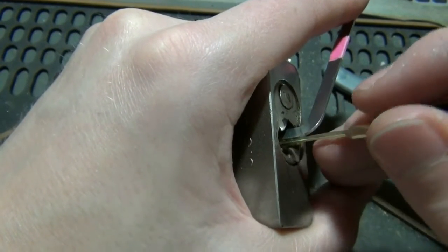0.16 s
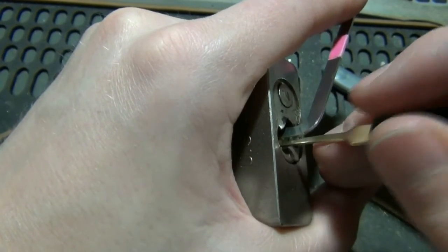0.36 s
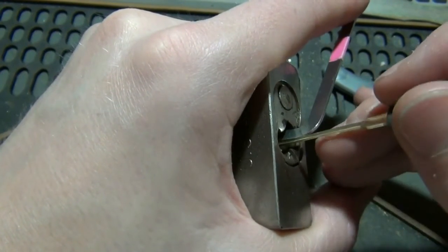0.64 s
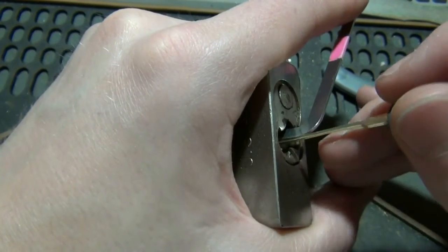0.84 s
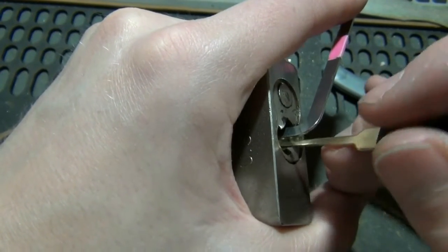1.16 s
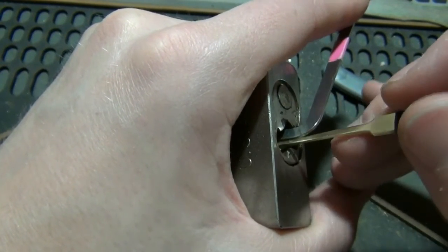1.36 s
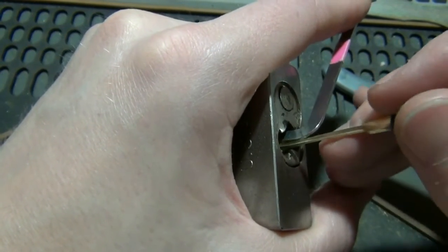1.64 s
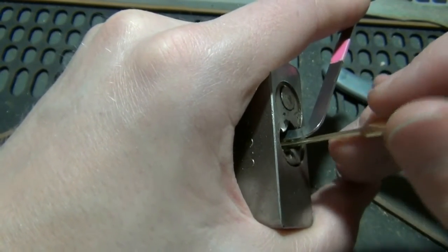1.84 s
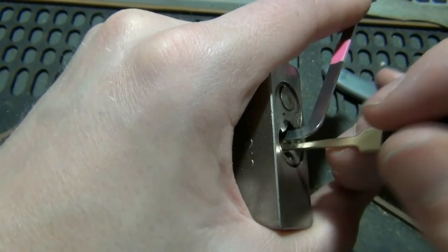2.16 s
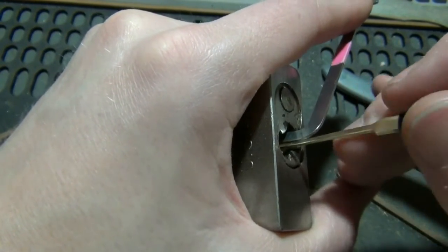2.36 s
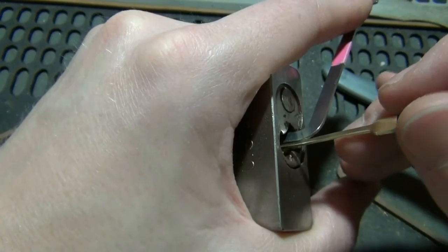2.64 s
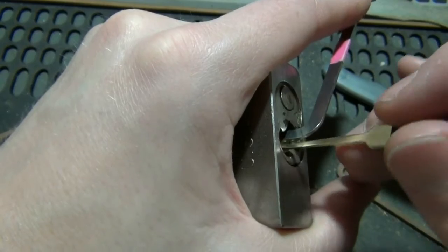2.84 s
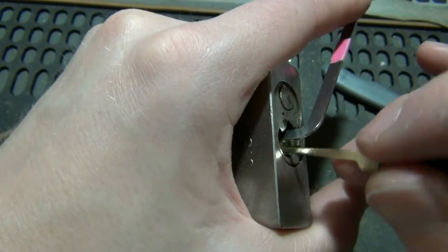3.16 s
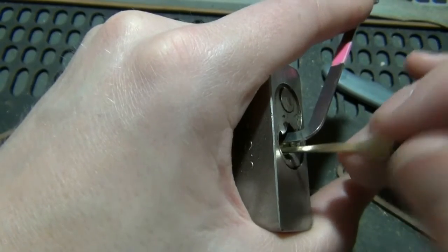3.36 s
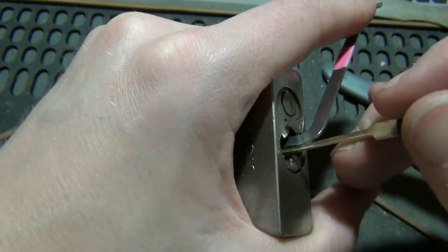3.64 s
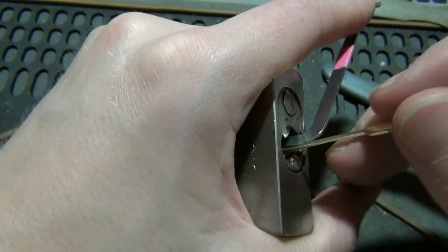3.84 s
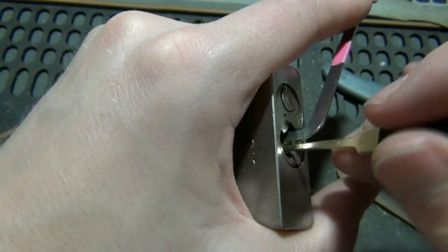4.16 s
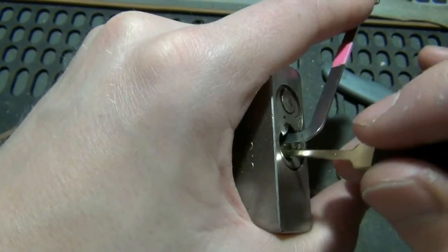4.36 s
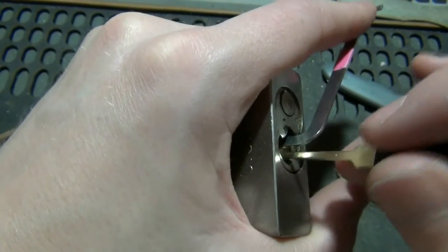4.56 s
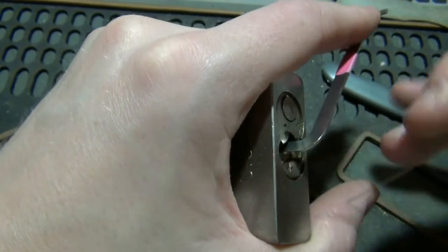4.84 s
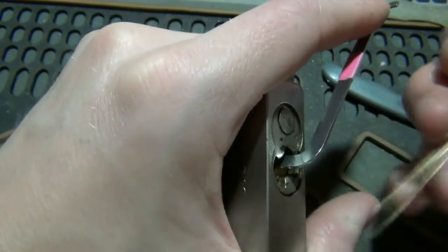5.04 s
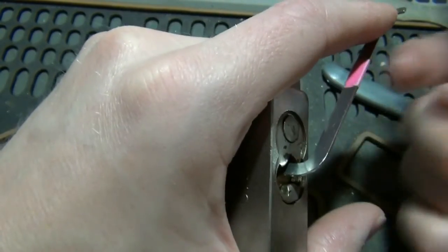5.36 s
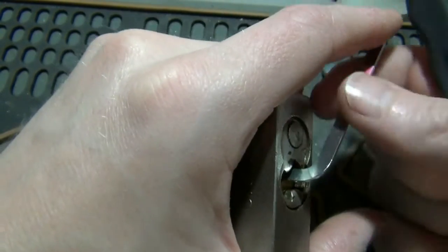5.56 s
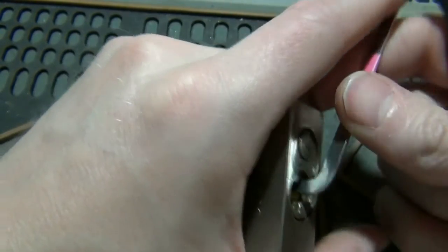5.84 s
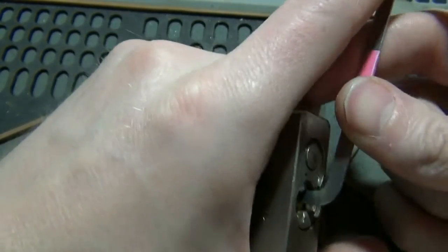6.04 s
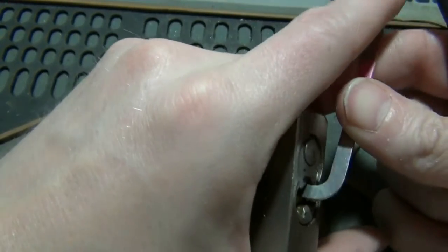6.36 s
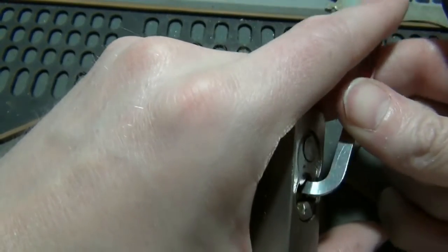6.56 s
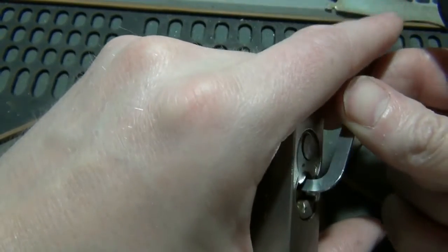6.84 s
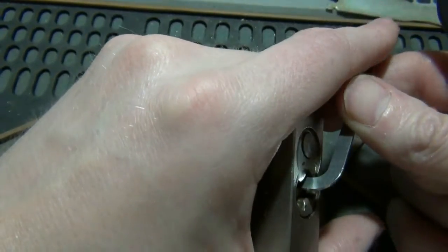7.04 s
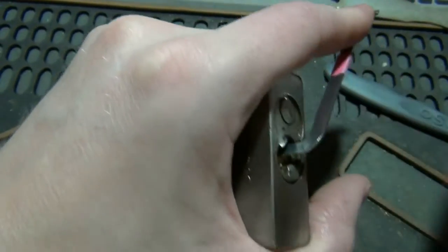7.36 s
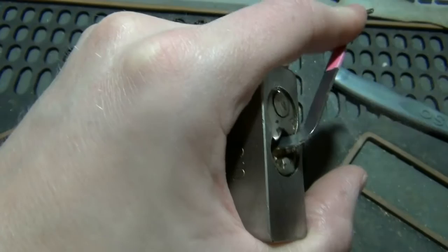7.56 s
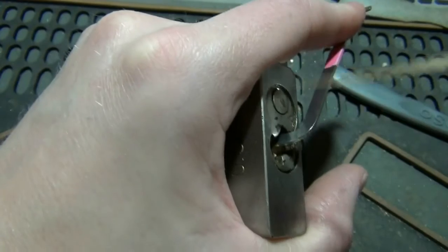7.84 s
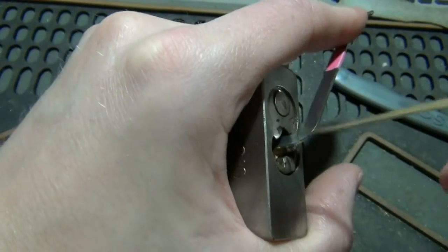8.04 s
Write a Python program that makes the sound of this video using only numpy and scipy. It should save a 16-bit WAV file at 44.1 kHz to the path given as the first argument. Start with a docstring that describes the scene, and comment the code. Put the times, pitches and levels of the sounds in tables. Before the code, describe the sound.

A padlock is worked in the hand close to the microphone, slightly right of centre, in a small room with quiet air, a soft fan drone, low hum and a thin beating high whine. A duller click at 0.3 s follows faint ticks; brighter snaps come at about 1.0, 1.3, 1.5 and 1.9 s, some with a brief springy shimmer. A tight cluster clicks at 2.3 s, then mostly faint ticks until firmer contacts at 4.1-4.3 s, the last with a low knock. From 4.7 to 4.9 s the pick rattles and scrapes out. Dull knocks and dry finger rubbing follow at 5.0-5.6 s, with a softer-toned click near 5.5 s and the loudest sharp snap at 5.7 s. Weak ticks appear around 6.5-6.8 s, then gentle skin rubbing and small scuffs at 7.1-7.7 s before the quiet background remains.

```python
"""A padlock is picked in the hand, close to the microphone, over a workbench in a small room.
Pick and pins snap: noisy bursts of force excite the lock's damped modes; faint ticks fall between.
Filtered noise makes the ringing springs and tools, scrapes, scuffs, rubbing fingers, dull bumps and low knocks.
The pick is drawn out and fingers reset the tension wrench. Reflections and a faint tail place the lock
in the room; behind it lie air noise, a droning fan, wavering hum and a thin beating whine."""
import sys
import numpy as np
from scipy import signal
from scipy.fft import rfft, irfft, next_fast_len
from scipy.io import wavfile

SR = 44100
rng = np.random.default_rng(int(sys.argv[2]) if len(sys.argv) > 2 else 0)


def unload_audio(sound):
    """Save the sound as a 16-bit wav file, at the path given as the first command line argument."""
    columns = np.transpose(np.atleast_2d(sound))
    # keep every value between -1 and 1, then stretch to whole-number steps
    steps = np.round(np.clip(columns, -1, 1) * 32767)
    wavfile.write(sys.argv[1], SR, steps.astype(np.int16))


N = 361619
TIME = np.arange(N) / SR

# room air, relative spectrum: (f/Hz, level/dB per Hz)
AIR_SPECTRUM = [(20, -12.5), (45, -1.5), (75, 3), (130, -6), (170, -7), (330, -9), (500, -12), (1000, -12),
                (2000, -15), (3000, -18), (3800, -21), (7000, -21.5), (11000, -23), (15800, -23.5)]
# fan housing resonances: (f/Hz, width/Hz before the fan's widening, relative level/dB)
FAN_MODES = [(616.7, 59, 2.5), (685, 24.5, 0), (877.6, 74, 3), (1118, 130, -8), (1339, 80, -2.5),
             (1671, 80, -4)]
AIR_DB, FAN_DB = -60, -63.5  # rms of the part common to both channels, before panning
# mains and motor hum, mean values: (f/Hz, rms level/dB)
HUM_TONES = [(80.7, -72.5), (120, -73), (240, -79.5), (635, -84)]
# whine of the electronics, the upper pair beating: (f/Hz, rms level/dB)
WHINE_TONES = [(11832, -79), (15734.3, -67.5), (15747.5, -72.5)]
# dull bumps of the hands, and the low knocks of some hard contacts:
# (centre t/s, length/s, peak level/dB, centre f/Hz)
BUMPS_AND_KNOCKS = [(0.244, 0.11, -48, 104), (1.094, 0.07, -54, 105), (1.504, 0.02, -54, 220),
                    (1.665, 0.034, -55, 140), (2, 0.15, -58.5, 90), (2.875, 0.048, -66, 85),
                    (4.283, 0.017, -43.5, 262), (5.051, 0.051, -50, 160), (5.053, 0.016, -53, 347),
                    (5.84, 0.075, -57.5, 95), (6.879, 0.13, -64, 333), (7.174, 0.2, -63, 340),
                    (7.727, 0.44, -62.5, 325)]
# skin sliding over lock and tools: (centre t/s, length/s, peak level/dB, tilt/dB per octave)
SKIN_RUBS = [(5.113, 0.15, -55.5, -3), (5.206, 0.15, -56.5, 2), (5.362, 0.19, -53.5, -1),
             (5.543, 0.077, -61.5, 4), (5.63, 0.099, -64, -2), (7.102, 0.091, -56.5, 2),
             (7.27, 0.2, -57, 0), (7.474, 0.17, -58.5, 3.5), (7.619, 0.22, -59.5, 0.7)]
# broad peaks of skin rubbing on metal: (f/Hz, width/Hz of one filter pass, mean relative level/dB)
SKIN_PEAKS = [(1630, 2600, -1.5), (2980, 2900, 5), (6770, 3300, -1), (9300, 1800, -1.5),
              (13500, 5000, -0.5)]
# scrapes of metal in the keyway, and two short scuffs of the rubbing hand (the last two rows):
# (centre t/s, length/s, peak level/dB, centre f/Hz)
SCRAPES_AND_SCUFFS = [(0.236, 0.046, -57, 3480), (0.398, 0.061, -56.5, 5060), (1.084, 0.14, -62, 5430),
                      (1.276, 0.027, -46, 4900), (1.98, 0.2, -62.5, 4500), (3.394, 0.06, -60.5, 9000),
                      (4.667, 0.083, -55.5, 6000), (4.727, 0.11, -47, 6550), (4.86, 0.17, -56.5, 6360),
                      (5.042, 0.03, -46.5, 4500), (5.088, 0.03, -48.5, 7000), (5.866, 0.24, -64.5, 5500),
                      (7.294, 0.055, -62, 2900), (7.635, 0.057, -63, 2600)]
# springs and tools left ringing, and one low knock that dies away (900 Hz):
# (t/s, f/Hz, width/Hz of one filter pass, starting level/dB, t60/s)
RINGS_AND_KNOCK = [(.962, 12500, 3000, -37, 0.2), (.962, 5050, 4000, -49, 0.2),
                   (1.283, 12600, 3000, -45, 0.18), (1.868, 13500, 3000, -43, 0.17),
                   (1.868, 5100, 5000, -43.5, 0.13), (2.286, 11900, 1500, -53, 0.13),
                   (4.151, 2400, 60, -54, 0.17), (4.242, 2330, 50, -46, 0.069),
                   (4.85, 7700, 900, -52, 0.22), (5.469, 2270, 900, -49, 0.16),
                   (5.467, 900, 300, -49, 0.073), (5.681, 6700, 1500, -55, 0.1),
                   (5.83, 6650, 343, -67.5, 0.5)]
# the hand-damped lock with the tools in it, mean modes: (f/Hz, relative level/dB, t60/s)
LOCK_MODES = [(260, -9, 0.0088), (875, -9, 0.032), (1596, -8, 0.03), (1770, -5, 0.014), (2360, -7, 0.026),
              (2780, 3, 0.0082), (3090, 3, 0.0079), (4440, -10, 0.011), (5220, 1, 0.0073),
              (5720, 8.5, 0.0072), (6610, 4.5, 0.0057), (7300, -22, 0.0096), (8540, -1.5, 0.011),
              (9730, -3.5, 0.011), (11050, 4, 0.013), (11700, -8, 0.022), (11900, 11.5, 0.005),
              (12200, 5, 0.012), (13240, -7, 0.0047), (14220, 10, 0.0058), (16400, -13, 0.0038)]
# borders of the six registers, knock to sparkle: (f/Hz)
REGISTER_EDGES = [120, 600, 2000, 4000, 7500, 11000, 15800]
# an average contact in each register, knock to sparkle, relative to its strength: (level/dB)
MEAN_CONTACT_DB = [-15, 1, 7, -0.5, -0.75, -1]
# lift of each register by a harder contact: (level/dB per dB of hardness)
HARDNESS_SHARES = [0, 0.021, 0.067, 0.087, .59, 1]
# lift of each register by a firmer seat in the lock's body: (level/dB per dB of seat)
BODY_SHARES = [0.83, 0.98, 1, 0.058, 0, 0]
# pick, pin and wrench contacts: (t/s, strength level/dB, hardness level/dB,
# part passed to the lock's body level/dB, struck part f/Hz, share of sliding before the snap/0-1)
CONTACTS = [(0.198, -52.5, -2.5, -0.5, 1690, 0.1), (0.2139, -61, 6, -1, 2210.0, 0),
            (0.2591, -34.5, -18.5, -6.5, 5830, 0.02), (0.3884, -54.5, -2, -8, 5100, 0.12),
            (0.6754, -56.5, -16, -8, 4770, 0.1), (0.6901, -59, -1, -5, 1640.0, 0.3),
            (0.9604, -30, 5.5, -11, 4740, 0.05), (1.0523, -53.5, -16, -13, 6100, 0),
            (1.0763, -54, -10, -2, 2340, 0.47), (1.281, -27.0, 1.5, -16.5, 5960, 0.1),
            (1.3183, -46, 5.5, -8.5, 5050, 0.06), (1.5049, -30, -8, -18.5, 6530, 0.11),
            (1.662, -43.5, -5.5, -10, 4900, 0.16), (1.8664, -25.5, 1.5, -12.5, 4750, 0.01),
            (1.947, -48, 6.5, -4.5, 5860, 0.2), (1.9907, -58.5, -13, -5, 5900.0, 0.16),
            (2.0106, -56.5, -14, -4, 6000, 0), (2.1698, -70, -5, 8, 3120, 0.17),
            (2.2597, -43.5, -18, -11, 5850.0, 0.15), (2.2692, -44, -15, -16, 5960.0, 0.1),
            (2.2813, -43.5, 1, -2, 2820.0, 0.4), (2.2842, -35, 4.5, -9, 5960, 0),
            (2.3033, -37.5, -1, -18.5, 4870, 0.01), (2.8457, -61.5, -14, 2, 2750, 0.5),
            (3.4074, -56.5, -14, -6, 5930.0, 0.2), (3.4556, -55.5, 1, -10, 6640, 0.1),
            (3.482, -46, -6.5, -9, 5100, 0.16), (3.7018, -60, 1, -3.5, 2810.0, 0.12),
            (3.953, -53, -10.5, -12, 4360, 0.6), (4.0303, -53.5, -5, -21, 6060.0, 0.15),
            (4.0833, -41.0, -6, -3, 3210, 0.1), (4.1504, -36.5, -3, -3, 1560, 0.08),
            (4.2411, -41.0, -2, -13, 5640, 0.36), (4.2857, -32.5, -5.5, -11, 7080, 0.2),
            (4.5866, -57, -11, -9, 7020.0, 0.1), (4.6863, -33.0, 3.5, -12.5, 6600, 0.01),
            (4.69, -36.5, -5, -11.5, 5800.0, 0.37), (4.698, -47, 2, -18, 6890.0, 0.15),
            (4.716, -46, 2, -25, 4660.0, 0.1), (4.731, -46, -8, -14, 6700, 0.29),
            (4.7554, -43, -5, -14, 6700, 0.6), (4.8248, -55.5, -7, -9, 6540, 0.3),
            (4.8508, -42, -11.5, -8, 2770.0, 0.44), (5.0489, -48, -3, 2, 2700, 0.46),
            (5.0807, -51, -7, -1.5, 6900, 0.1), (5.4662, -33, -26, -12, 4470, 0.07),
            (5.6802, -19.5, -12.5, -18.5, 5870, 0.02), (5.861, -55.5, -25, -17, 5570.0, 0.05),
            (6.4551, -50, -17, 6, 2730, 0.06), (6.654, -64, 11.5, -15, 4380, 0.03),
            (6.7613, -60, -9, 0, 3030.0, 0.15)]
# the pick's free length at zero hardness; harder contacts set a lower frequency
PICK_HZ, PICK_OCTAVES_PER_DB = 10500, -0.15


def amp(db):
    """Turn dB into an amplitude factor."""
    return 10 ** (np.asarray(db) / 20)


def unit(x):
    """Scale to rms 1."""
    return x / np.sqrt(np.mean(x ** 2) + 1e-30)


def add(track, s, x):
    """Mix x into the track from time s on."""
    i = max(int(round(s * SR)), 0)
    track[i:i + len(x)] += x[:max(N - i, 0)]


def resonate(x, hz, width_hz):
    """A steep resonance: one band-pass applied twice."""
    b, a = signal.iirpeak(min(hz, .45 * SR), hz / min(width_hz, .4 * SR), fs=SR)
    once = signal.lfilter(b, a, x)
    return signal.lfilter(b, a, once)


def colour(x, points):
    """Shape a spectrum by (f/Hz, level/dB) points, joined along log frequency."""
    hz, db = np.transpose(points)
    size = next_fast_len(len(x))
    f = np.maximum(np.fft.rfftfreq(size, 1 / SR), 1)
    gain = amp(np.interp(np.log(f), np.log(hz), db))
    return irfft(rfft(x, size) * gain, size)[:len(x)]


def tilt(x, db_per_octave):
    """Brighten or dull a sound between 1.5 and 12 kHz, holding the gain above."""
    return colour(x, [(1500, 0), (12000, 3 * db_per_octave)])


def even_out(x, share):
    """Partly flatten the chance peaks and dips in the spectrum of a short burst."""
    spectrum = rfft(x)
    flattening = (np.abs(spectrum) + 1e-9) ** np.clip(share, 0, 1)
    return unit(irfft(spectrum / flattening, len(x)))


def walk(rate):
    """Smooth chance with a spread near 1: random knots, rate per second, joined by lines."""
    knots = rng.standard_normal(int(N / SR * rate) + 2)
    return np.interp(TIME * rate, np.arange(len(knots)), knots)


def grains(n, spread_db, size=16):
    """Dense tiny slips of very unequal size, each a few samples of noise."""
    grain_db = spread_db * np.repeat(rng.standard_normal(n // size + 1), size)[:n]
    return unit(rng.standard_normal(n) * amp(grain_db))


def stroke(track, s, length, db, x):
    """Return the track with a stretch of x that swells and fades around time s."""
    n = int(length * SR)
    i = max(int(s * SR) - n // 2, 0)
    swell = np.sin(np.linspace(0, np.pi, n))
    out = np.zeros(N)
    out[i:i + n] = amp(db) * unit(x[i:i + n]) * swell
    return track + out


def room_air(sides, bass_pan_db=-7.0):
    """Broad air noise with a weaker part opposed between the channels."""
    air, air_side = (amp(AIR_DB) * unit(colour(rng.standard_normal(N), AIR_SPECTRUM)) for _ in range(2))
    air_side = colour(air_side, [(60, -12), (200, -5), (500, -9), (1300, -10),
                                 (3000, -19.0), (8000, -8), (13000, -23)])
    # the rumble lies to the right
    rumble = colour(air, [(100, 2.5), (200, -27), (600, -35)])
    pan = np.tanh(bass_pan_db * np.log(10) / 40)
    return air + sides * (air_side + pan * rumble)


def fan_drone(sides, side_db=-10, pan_db=-2.5, widening=1.34):
    """Turbulent flow excites the fan housing's resonances, wavering in level, slightly right."""
    fan, fan_side = (unit(sum(amp(db) * resonate(flow, hz, widening * width) for hz, width, db in FAN_MODES))
                     for flow in rng.standard_normal((2, N)))
    level = amp(FAN_DB + 0.62 * walk(17) + sides * pan_db / 2)
    return level * (fan + sides * amp(side_db) * fan_side)


def hum(waver_db=1.5, wander_hz=1.313):
    """Mains and motor sines that waver in level and pitch."""
    out = np.zeros(N)
    for hz, db in HUM_TONES:
        level = np.sqrt(2) * amp(db + waver_db * walk(11.0))
        phase = 2 * np.pi * np.cumsum(hz + wander_hz * walk(10)) / SR
        out += level * np.sin(phase)
    return out


def whine():
    """Steady high sines of the electronics; two close ones beat."""
    return sum(np.sqrt(2) * amp(db) * np.sin(2 * np.pi * hz * TIME) for hz, db in WHINE_TONES)


def background():
    """Room air, a fan droning in its housing, hum and a thin beating whine."""
    sides = np.array([[1], [-1]])  # left, right
    return room_air(sides) + fan_drone(sides) + hum() + whine()


def room(x, bench_s=0.01, bench_db=-24, near_db=-19, near_t60=0.024, tail_db=-23, tail_t60=0.33):
    """One clear reflection, quick scatter from things on the bench, and a short faint tail."""
    t = TIME[:SR // 2]
    out = []
    shared = rng.standard_normal(len(t))
    for _ in range(2):
        # both channels share most of the scatter, silent for the first 3 ms
        diffuse = unit(shared + 0.37 * rng.standard_normal(len(t))) * (t > .003)
        response = np.zeros(len(t))
        for db, t60 in ((near_db, near_t60), (tail_db, tail_t60)):
            decay = np.exp(-np.log(1000) * t / t60)
            response += amp(db) * unit(diffuse * decay) / np.sqrt(len(t))
        response[int(bench_s * SR)] += amp(bench_db)
        out.append(signal.fftconvolve(x, response)[:N])
    return np.array(out)


def bumps_and_knocks():
    """Dull bumps of the hands and low knocks of hard contacts: narrow low noise that swells and fades."""
    out, push = np.zeros(N), rng.standard_normal(N)
    for s, length, db, hz in BUMPS_AND_KNOCKS:
        out = stroke(out, s, length, db, resonate(push, hz, 142))
    return out


def rubbing(catch_db=2.0, drift_db=3.5):
    """Dry skin hisses on the metal, catching and changing colour as the contact moves."""
    skin = np.zeros(N)
    for hz, width, db in SKIN_PEAKS:
        skin += amp(db + drift_db * walk(20)) * resonate(grains(N, spread_db=3.5), hz, width)
    skin = skin * amp(catch_db * walk(60))
    out = np.zeros(N)
    for s, length, db, slope in SKIN_RUBS:
        out = stroke(out, s, length, db, tilt(skin, slope))
    return out


def scrapes_and_scuffs(width_share=1.5, modes_db=-9, catch_db=6.5):
    """Metal sticks and slips in the keyway, coloured by the lock; two hand scuffs share its uneven grain."""
    slips = grains(N, spread_db=6.5) * amp(catch_db * walk(170))
    ringing = sum(amp(db) * resonate(slips, hz, 4 / t60) for hz, db, t60 in LOCK_MODES if hz < SR / 4)
    rasp = colour(unit(slips) + amp(modes_db) * unit(ringing),
                  [(1500, 12), (2800, 8), (4000, -2), (9000, -1.0), (12500, 4), (15000, 4)])
    out = np.zeros(N)
    for s, length, db, hz in SCRAPES_AND_SCUFFS:
        out = stroke(out, s, length, db, resonate(rasp, hz, width_share * hz))
    return out


def rings_and_knock():
    """Springs and tools ring on, and one low knock dies away: bands of noise under a decay."""
    out, t = np.zeros(N), TIME[:SR // 3]
    for s, hz, width_hz, db, t60 in RINGS_AND_KNOCK:
        # keep the end of the noise, where the filter has settled
        cluster = unit(resonate(rng.standard_normal(SR), hz, width_hz)[-len(t):])
        decay = np.exp(-np.log(1000) * t / t60)
        add(out, s, amp(db) * cluster * decay)
    return out


def contact_force(t, favoured_hz, slide, rebound, rebound_s=.0006, rise_s=0.00056, snap_s=0.00025,
                  slide_s=0.0028, rattle_db=-22, rattle_s=0.0038):
    """The pick slips, the pin snaps home 5 ms in and chatters: noise under a pressure curve."""
    since = t - .005
    away = np.abs(since)
    chatter = amp(rattle_db) * np.exp(-away / rattle_s)
    blow = np.where(since < 0, np.exp(-away / rise_s), np.exp(-away / snap_s) + chatter)
    slip = (since < 0) * np.exp(-away / slide_s)
    share = np.clip(slide, 0, .8)
    pressure = np.sqrt((1 - share) * unit(blow) ** 2 + share * unit(slip) ** 2)
    # partly flatten the noise burst's spectrum, so that no resonance of the click is lost
    force = even_out(rng.standard_normal(len(t)) * pressure, share=0.29)
    force = force * np.minimum(6 * pressure / pressure.max(), 1)
    # the pin lands again after whole swings of the struck part, which ripples the spectrum
    swings = max(round(rebound_s * favoured_hz[0]), 1)
    return force + rebound * np.roll(force, int(round(swings * SR / favoured_hz[0])))


def lock_body(t, favoured_hz, crack_db, low_db, high_db, scatter_db=3):
    """The lock's impulse response: a sum of damped modes, weighted anew by every contact point."""
    hz, db, t60 = np.transpose(LOCK_MODES)
    chance = rng.standard_normal((len(LOCK_MODES), 2))
    mode_hz = hz * (1 + .012 * chance[:, 0])
    modes = np.cos(2 * np.pi * mode_hz[:, None] * t) * amp(-60 * t / t60[:, None])
    body = amp(db + scatter_db * chance[:, 1]) @ modes
    # two broad, quickly damped resonances; any above half the sample rate folds back down
    damping = amp(-60 * t / .0042)
    body = body + amp([low_db, high_db]) @ np.cos(2 * np.pi * np.outer(favoured_hz, t)) * damping
    # the crack is the force heard directly
    body[0] += amp(crack_db) * np.sqrt(np.sum(body ** 2))
    return body


def click(register_db, favoured_hz, slide, crack_db, low_db, high_db, rebound):
    """One contact: its force rings the lock's modes, then each register is set to its level."""
    t = np.arange(2048) / SR
    force = contact_force(t, favoured_hz, slide, rebound)
    body = lock_body(t, favoured_hz, crack_db, low_db, high_db)
    sound = signal.fftconvolve(force, body)[:len(t)]
    out = 0
    for lo, hi, level_db in zip(REGISTER_EDGES, REGISTER_EDGES[1:], register_db):
        band = signal.butter(4, [lo, hi], "band", fs=SR, output="sos")
        part = signal.sosfilt(band, sound)
        # the level counts the energy as if spread over 5 ms
        out = out + amp(level_db) * unit(part) * np.sqrt(.005 / t[-1])
    return out


def fidgeting(count=18, first_s=.1, last_s=4.8, level_db=-65, spread_db=2):
    """The pick keeps touching the pins lightly: faint, dull ticks at random moments."""
    out = np.zeros(N)
    softness_db = np.array([-22, 6, 3.5, -0.5, -9, -3])  # per register
    for when, strength, mode in rng.random((count, 3)):
        # the struck part shares one of the middle modes of the lock
        hz = LOCK_MODES[int(mode * len(LOCK_MODES) / 2) + len(LOCK_MODES) // 4][0]
        register_db = level_db + spread_db * (2 * strength - 1) + softness_db
        tick = click(register_db, [hz, 2 * hz], .2, crack_db=-24, low_db=8, high_db=0, rebound=0.23)
        add(out, first_s + when * (last_s - first_s), tick)
    return out


def picking(crack_db, low_db, high_db, rebound, lead_s=.0054):
    """Contacts of pick, pins and wrench: strength sets level, hardness treble, seat in the body lows."""
    out = np.zeros(N)
    for s, db, hardness_db, body_db, part_hz, slide in CONTACTS:
        hardness_lift_db = hardness_db * np.array(HARDNESS_SHARES)
        body_lift_db = body_db * np.array(BODY_SHARES)
        register_db = db + np.array(MEAN_CONTACT_DB) + hardness_lift_db + body_lift_db
        pick_hz = PICK_HZ * 2 ** (PICK_OCTAVES_PER_DB * hardness_db)
        snap = click(register_db, [part_hz, pick_hz], slide, crack_db, low_db, high_db, rebound)
        add(out, s - lead_s, snap)
    return out


def scene():
    """The lock is held close, slightly right of the microphone, with the room around it."""
    scrapes = scrapes_and_scuffs()
    close = picking(crack_db=-43, low_db=15.5, high_db=9.5, rebound=0.19)
    close = close + fidgeting() + scrapes + rings_and_knock() + rubbing() + bumps_and_knocks()
    # the room hears the lock from all sides, so single modes stand out less
    radiated = picking(crack_db=2, low_db=7, high_db=3, rebound=0.085) + scrapes
    left = colour(close, [(200, -2.3), (700, -1.0), (2400, -4.5), (5000, -1.5),
                          (8200, -3.0), (12500, -0.8), (16000, 0)])
    right = colour(close, [(200, 0.0), (700, 2.5), (2400, -1.5), (5000, 1.8),
                           (8200, 3.5), (12500, 0.5), (16000, -0.5)])
    return np.array([left, right]) + room(radiated) + background()


def record(dry):
    """The recorder cuts the top: a steep low-pass at 16 kHz."""
    return signal.sosfilt(signal.ellip(10, .1, 80, 16000, fs=SR, output="sos"), dry)


dry = scene()
out = record(dry)
unload_audio(out)
```